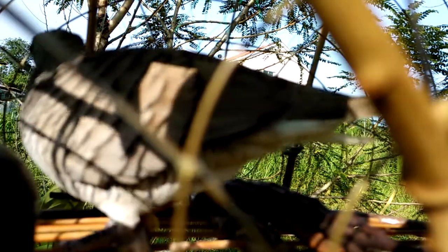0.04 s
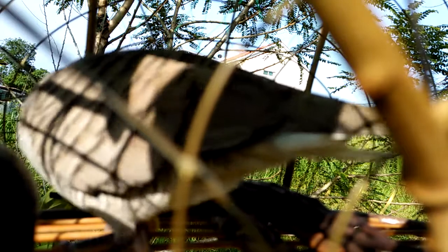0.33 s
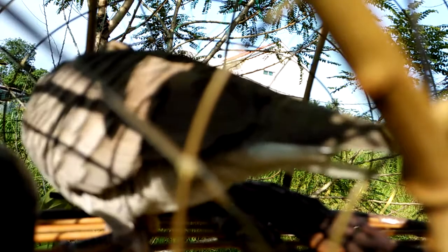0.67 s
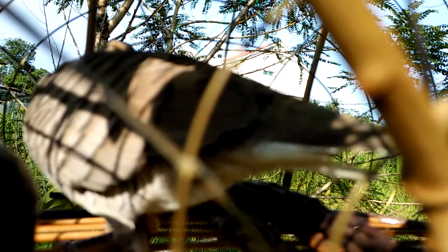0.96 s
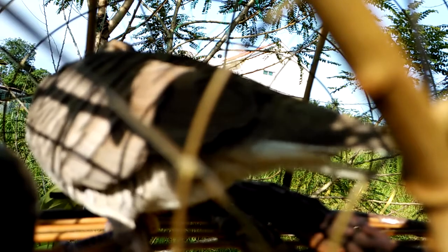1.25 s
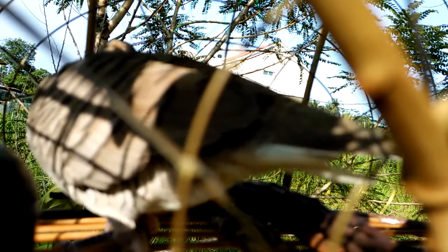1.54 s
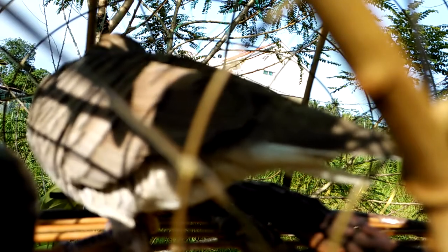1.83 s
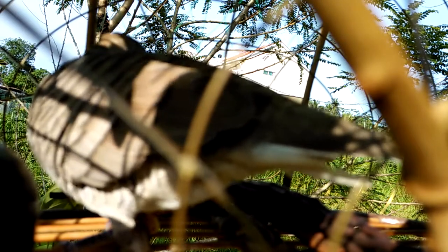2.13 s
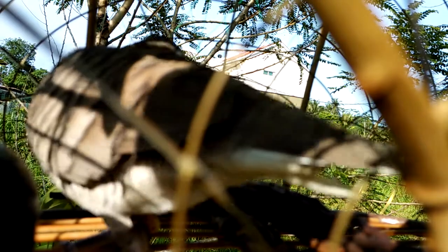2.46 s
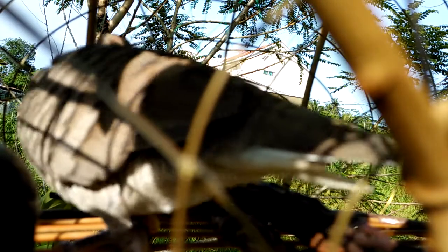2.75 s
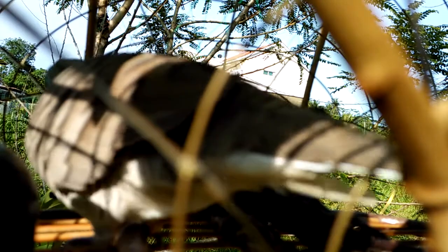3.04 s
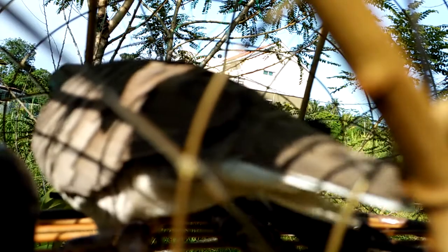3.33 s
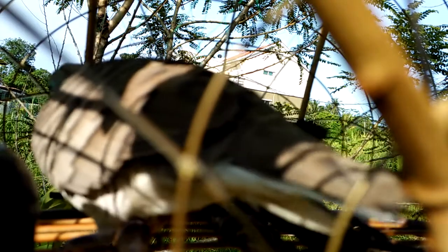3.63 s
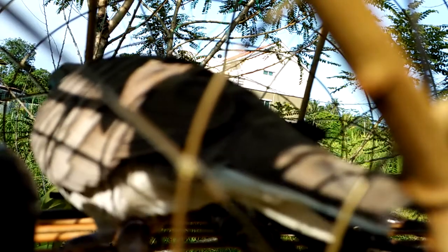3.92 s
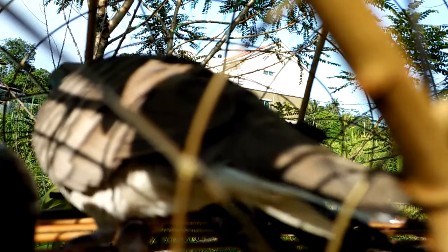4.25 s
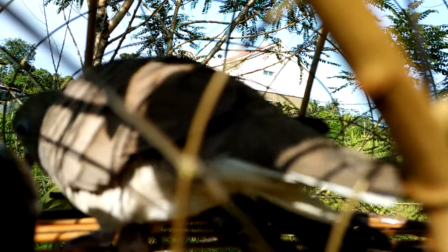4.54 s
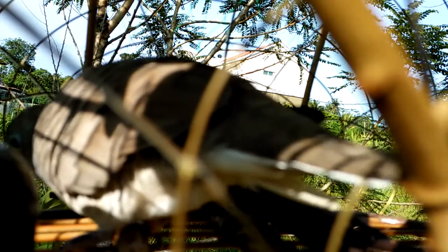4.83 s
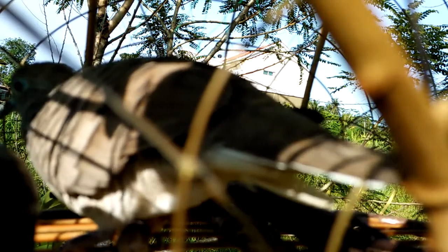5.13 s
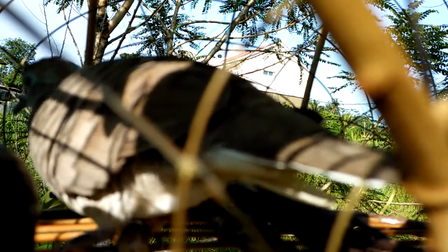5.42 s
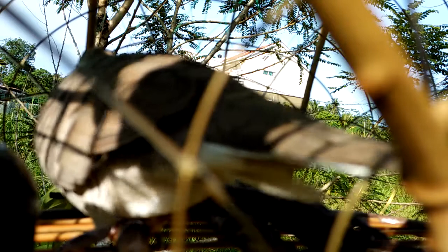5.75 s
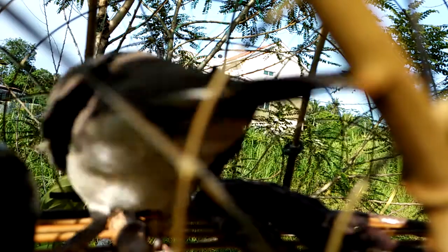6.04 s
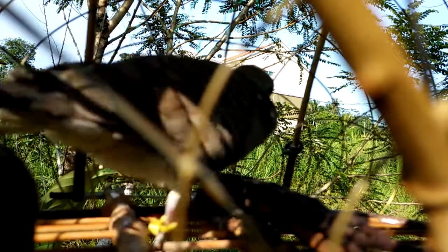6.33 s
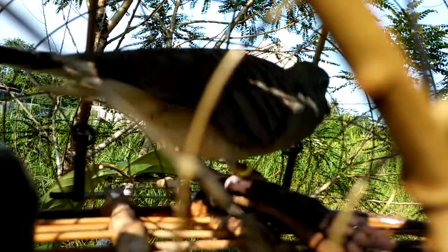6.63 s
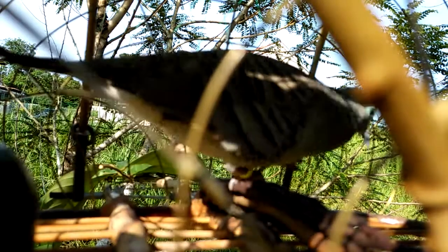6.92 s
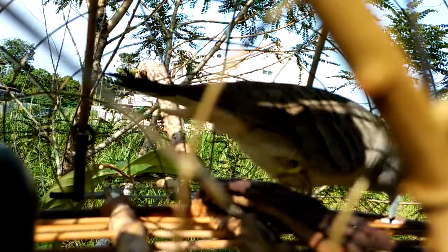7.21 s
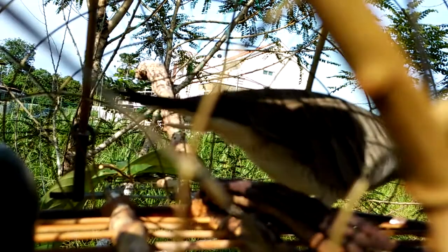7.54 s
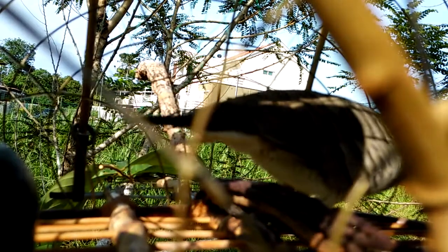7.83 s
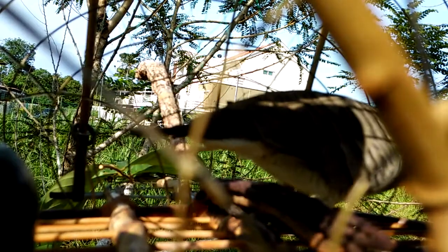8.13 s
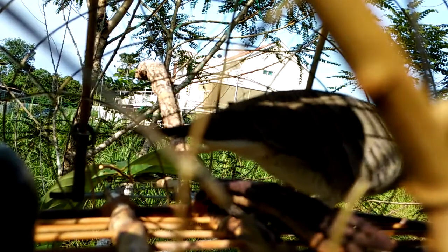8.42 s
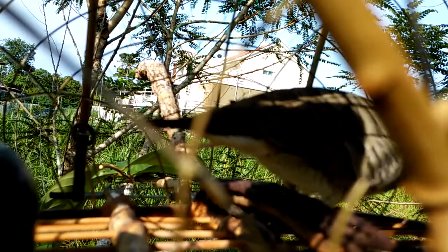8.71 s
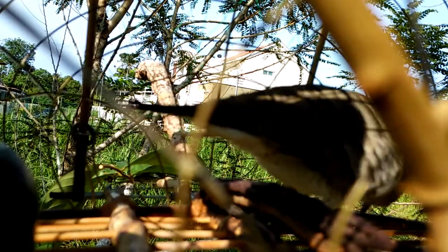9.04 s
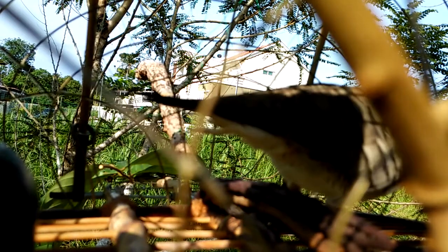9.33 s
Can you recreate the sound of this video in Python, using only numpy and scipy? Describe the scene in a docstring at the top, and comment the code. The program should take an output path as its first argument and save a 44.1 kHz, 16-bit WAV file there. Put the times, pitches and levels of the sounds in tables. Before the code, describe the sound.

A steady, high, gently throbbing insect hiss fills a garden throughout, with small birds chirping and piping in the distance. Beneath lie quiet air, a soft low rumble and a very faint motor rising and falling far away. At about 3 seconds a claw ticks lightly on a perch, and a dove close to the microphone gives a loud, fast, rattling coo that slows and breaks into separate pops, ending near 4.4 seconds. From about 5.4 to 6.6 seconds a second dove answers with the same pattern, softer, farther off and with a little echo. Small dry claw ticks come at around 6.1 and 6.7 seconds. At 7.7 seconds the near dove coos again, its loud trill breaking into fading pops by 8.8 seconds. Insects and faint chirps carry on until the end, at about 9.5 seconds.

```python
"""Zebra doves in a garden

A dove in a cane cage coos twice, close by; a second dove answers softly in between.
Each coo is a rattle of 1 kHz puffs through the syrinx that slows and breaks up into single pops.
Insects hiss in the trees, small birds chirp far off, and claws tick as the dove shifts on its perch.
Underneath lie quiet air, a low rumble and a faint motor revving in the distance."""
import sys
import numpy as np
from scipy import signal
from scipy.fft import rfft, irfft, next_fast_len
from scipy.io import wavfile
from scipy.ndimage import map_coordinates

SR = 44100
rng = np.random.default_rng(int(sys.argv[2]) if len(sys.argv) > 2 else 0)


def transcribe(signal):
    """Save signal, clipped to [-1, 1], as a 16-bit WAV file at the path in sys.argv[1]."""
    frames = np.atleast_2d(signal).T
    limited = np.clip(frames, -1, 1)
    pcm = np.round(limited * 32767).astype(np.int16)
    wavfile.write(sys.argv[1], SR, pcm)


N = 422037

# Levels in all tables are relative: each layer sets its own gain on top.
# the far motor's revs: time_s, firing_hz, level_db
MOTOR_REVS = [(0, 115.1, -95), (1.8, 111.1, -91.5), (2.2, 121.9, -82.5), (2.6, 150.2, -80.5),
              (3.1, 158, -82), (4.0, 135, -80), (4.6, 180.6, -87), (5.5, 135.6, -87.5), (6.2, 104.7, -78.5),
              (7.1, 112.6, -81), (7.9, 186.5, -80), (8.7, 151.9, -86), (9.57, 111.4, -88.5)]


def amp(db):
    """Decibels to gain."""
    return 10 ** (np.asarray(db) / 20)


def unit(x):
    """x at rms 1."""
    return x / np.sqrt(np.mean(x ** 2) + 1e-20)


def ramp(x):
    """x held between 0 and 1."""
    return np.clip(x, 0, 1)


def along(points, hz):
    """(freq_hz, value) points read on a log frequency axis."""
    freqs, values = np.transpose(points)
    return np.interp(np.log(hz + 1), np.log(freqs + 1), values)


def curves(rows):
    """Automation: one value per sample for each column after the time."""
    times, *columns = np.transpose(rows)
    return [np.interp(np.arange(N) / SR, times, column) for column in columns]


def wobble(rate, samples=N):
    """A smooth random curve, rate knots a second."""
    knots = rng.standard_normal(int((samples - 1) / SR * rate) + 4)
    return map_coordinates(knots, [np.arange(samples) * rate / SR])


def add(track, start_s, sound):
    """Mix a sound into a track."""
    start = int(np.clip(round(start_s * SR), 0, N))
    track[start:start + len(sound)] += sound[:N - start]


def filtered(x, response):
    """x through a complex frequency response."""
    size = next_fast_len(N + SR // 2)
    return irfft(rfft(x, size) * response(np.fft.rfftfreq(size, 1 / SR)), size)[..., :N]


def eq(x, colour):
    """x through a curve of (freq_hz, gain_db) points."""
    return filtered(x, lambda hz: amp(along(colour, hz)))


def noise(colour):
    """Coloured noise of rms 1."""
    return unit(eq(rng.standard_normal(N), colour))


def wide_noise(colour):
    """Coloured stereo noise of rms 1, widest near 9.5 kHz."""
    # likeness of left and right: freq_hz, correlation
    likeness = [(4000, 0.92), (6000, 0.98), (8000, 0.86), (9500, 0.44), (11500, 0.78), (14000, 1)]

    def mid_side(hz):
        angle = np.arccos(np.clip(along(likeness, hz), 0, 1)) / 2
        return amp(along(colour, hz)) * [np.cos(angle), np.sin(angle)]

    mid, side = filtered(rng.standard_normal((2, N)), mid_side)
    return unit(np.array([mid + side, mid - side]))


def reflected(x, walls):
    """x with its early reflections: one delayed, weaker copy per wall."""
    return filtered(x, lambda hz: 1 + sum(amp(db) * np.exp(-2j * np.pi * hz * s) for s, db in walls))


def tree_echo(x):
    """The diffuse echo of the garden: a noise tail that dies fastest in the treble."""
    # reverb time among the trees: freq_hz, t60_s
    decay = [(300, .35), (1000, 0.48), (4000, 0.42), (12000, 0.17)]
    hz, t, spectrum = signal.stft(rng.standard_normal(SR // 2), SR, nperseg=256)
    tail = signal.istft(spectrum * amp(-60 * t / along(decay, hz)[:, None]), SR, nperseg=256)[1]
    return signal.fftconvolve(x, tail / np.linalg.norm(tail))[:N]


def low_rumble():
    """Deep noise that swells softly now and then over a low floor."""
    # swells of rumble: middle_s, length_s, level_db
    swells = [(.87, 0.2, -66.5), (1.412, 0.3, -74.5), (2.166, 0.14, -66.5), (2.5, .25, -72.5),
              (3.523, 0.36, -68.5), (4.15, 0.33, -74.5), (5.602, 0.28, -71.5), (6.13, 0.11, -65.5),
              (6.363, 0.11, -65.5), (6.73, .32, -64.5), (7.102, 0.28, -68), (7.879, 0.21, -70.5),
              (8.229, 0.35, -73), (9.354, 0.11, -69)]
    # tone of the rumble: freq_hz, gain_db
    colour = [(15, -35.5), (25, -18), (45, -4), (62, -10.5), (72, -1.5), (78, 3.5), (86, -7), (98, -10),
              (120, -7.5), (160, -18), (240, -26), (400, -50.5)]
    t = np.arange(N) / SR
    floor_power = amp(-81) ** 2
    swell_power = sum(amp(db) ** 2 * np.exp(-(2 * (t - s) / length) ** 2) for s, length, db in swells)
    return np.sqrt(floor_power + swell_power) * amp(-1.5 + 1.2 * wobble(3)) * noise(colour)


def garden_air():
    """A quiet noise bed that sways and follows a share of the motor's swings in level."""
    # tone of the air: freq_hz, gain_db
    colour = [(100, -22.5), (160, -7), (215, -16.5), (290, -4.5), (360, -17.5), (440, -3), (520, -10),
              (800, -0.5), (1100, -8), (1800, -12.5), (2600, -13.5), (3800, -20), (4600, -8.5),
              (5200, -24.5), (8000, -39)]
    motor_db = curves(MOTOR_REVS)[1]
    level_db = -74.5 + 0.3 * (motor_db - motor_db.mean()) + 1.23 * wobble(3.1)
    return amp(level_db) * noise(colour)


def far_motor():
    """A faint drone: three harmonics of the firing rate rise and fall with the revs."""
    # engine harmonics: multiple_of_firing_rate, level_db
    orders = [(1, -3), (2, -18), (3, -11)]
    firing_hz, level_db = curves(MOTOR_REVS)
    firings = np.cumsum(firing_hz * (1 + .012 * wobble(12))) / SR
    drone = sum(amp(db + 2 * wobble(4.7)) * np.sin(2 * np.pi * order * firings) for order, db in orders)
    return amp(level_db - 1.5) * unit(drone)


def insects():
    """A chorus that throbs nine or ten times a second, under a steadier, higher hiss."""
    # strength of the chorus: time_s, level_db
    strength = [(0, -58), (.6, -61), (.92, -61), (1.38, -56), (2.2, -58.5), (3.12, -55.5), (4, -59.5),
                (4.8, -60.5), (5.6, -57.5), (6.25, -54.5), (6.8, -59), (7.7, -55), (8.5, -58.5),
                (9.57, -57)]
    # tone of the chorus: freq_hz, gain_db
    chorus_colour = [(3060, -49.5), (5200, -24), (7360, -0.5), (8120, -3), (9440, -18), (10000, -12.5),
                     (13000, -33), (22000, -120)]
    # tone of the hiss: freq_hz, gain_db
    hiss_colour = [(5290, -29.5), (9000, -8.5), (9570, -12.5), (11700, -0.5), (12400, -8), (13000, -19.5),
                   (14200, -23.5)]
    strength_db, = curves(strength)
    throb_phase = 2 * np.pi * np.cumsum(9.6 + 2 * wobble(6)) / SR
    throb_db = 1.9 * np.sin(throb_phase) * (1 + .45 * wobble(1.5)) + 1.35 * wobble(30)
    chorus = amp(strength_db - 2 + throb_db + .9 * wobble(330)) * wide_noise(chorus_colour)
    gentler_db = strength_db.mean() + .8 * (strength_db - strength_db.mean())
    hiss_db = gentler_db - 7.5 + .3 * throb_db + .7 * wobble(17) + 2 * wobble(700)
    return chorus + amp(hiss_db) * wide_noise(hiss_colour)


def bird_note(length_s, hz, db, glide, rasp, buzz=0):
    """One whistle; glide, random rasp and 780 Hz buzz are shares of its pitch. Rising notes arch."""
    samples = int(length_s * SR)
    t = np.arange(samples) / SR
    progress = t / t[-1]
    bend = glide * (np.sin(np.pi / 2 * progress) if glide > 0 else progress)
    roughness = rasp * (wobble(1100, samples) + .6 * wobble(200, samples))
    pitch_hz = hz * (1 + bend + roughness + buzz * np.sin(2 * np.pi * 780 * t))
    envelope = amp(db + 2.8 * wobble(200, samples)) * 2 * np.sin(np.pi * progress)
    return envelope * np.sin(2 * np.pi * np.cumsum(pitch_hz) / SR)


def small_birds():
    """Chips, buzzes, piping runs, slurs and far calls, smeared by the foliage."""
    # sparrows' falling chips: start_s, pitch_hz, level_db
    chips = [(0.032, 4460, -61.5), (.416, 4290, -65), (0.583, 4430, -62), (1.404, 4900, -62),
             (1.6, 5430, -67), (1.815, 3930, -65.5), (1.885, 4340, -68.5), (1.951, 3550, -67),
             (3.368, 4720, -62), (4.252, 4660, -60.5), (4.35, 4190, -69.5), (4.746, 4830, -61.5),
             (5.505, 4550, -73), (6.076, 4590, -61), (7.374, 4574, -64), (8.424, 4730, -58.5),
             (8.968, 4850, -65)]
    # rising buzzy calls: start_s, pitch_hz, level_db
    buzzes = [(0, 2400, -63), (.084, 3000, -64.5), (1.016, 3600, -70.5), (1.196, 2900, -68.5),
              (1.79, 2900, -64.5), (2.275, 2650, -62), (3.918, 2800, -71), (5.041, 2900, -70.5),
              (6.745, 3200, -69), (7.089, 2600, -72.5), (7.238, 2800, -75.5), (7.743, 2900, -70),
              (7.885, 2900, -67.5), (8.03, 2900, -66.5), (8.168, 2900, -69), (8.364, 2850, -68),
              (8.565, 2850, -67), (8.72, 2900, -72), (8.871, 2900, -70), (9.4, 2920, -75.5)]
    # runs of piping notes, each a little lower: start_s, length_s, first_hz, level_db
    runs = [(1.203, 0.29, 2954, -72.5), (2.443, .23, 2874, -67.5), (3.929, .3, 2720, -74.5),
            (6.312, 0.73, 2990, -81), (7.57, 0.15, 2670, -78)]
    # lower downward slurs: start_s, pitch_hz, level_db
    slurs = [(0.262, 1690, -79), (.611, 1470, -74), (.816, 1920, -72.5), (1.026, 1710, -79),
             (1.28, 1830, -73), (1.36, 1700, -73), (5.55, 2120, -68)]
    # drawn-out calls from very far off: start_s, length_s, start_hz, end_hz, level_db
    far_calls = [(0.917, 0.22, 793, 708, -74.5), (2.62, 0.45, 1244, 1138, -73),
                 (2.649, 0.71, 918, 928, -74.5), (6.906, 0.19, 1002, 950, -72),
                 (8.6, 0.111, 1880, 2080, -75), (8.9, 0.22, 520, 568, -76)]
    pipe_every_s, run_sink_hz_per_s, chatter_count = .085, 400, 45
    chip_s, chip_shape = .058, dict(glide=-.25, rasp=.05)
    out = np.zeros(N)
    for s, hz, db in chips:
        add(out, s, bird_note(chip_s, hz, db, **chip_shape))
    for s, hz, db in buzzes:
        add(out, s, bird_note(.054, hz, db, glide=.35, rasp=.045, buzz=.17))
    for s, length_s, hz, db in runs:
        for age in np.arange(0, length_s, pipe_every_s):
            add(out, s + age, bird_note(.072, hz - run_sink_hz_per_s * age, db, glide=-.055, rasp=.04))
    for s, hz, db in slurs:
        add(out, s, bird_note(.0637, hz, db, glide=-.216, rasp=.023))
    for s, length_s, start_hz, end_hz, db in far_calls:
        add(out, s, bird_note(length_s, start_hz, db, glide=end_hz / start_hz - 1, rasp=.032))
    # faint chatter: more chips at random times and pitches
    chatter_s = rng.uniform(0, N / SR, chatter_count)
    for s, (detune, size) in zip(chatter_s, rng.standard_normal((chatter_count, 2))):
        add(out, s, bird_note(chip_s, 3080 * np.exp(.35 * detune), -82 + 2 * size, **chip_shape))
    return amp(-2.5) * out + amp(-8.5) * tree_echo(out)


def claws():
    """Dry little ticks of noise as the dove shifts its feet."""
    # claws on the perch: start_s, level_db
    ticks = [(3.0762, -49), (6.1431, -43), (6.7039, -50.5)]
    # tone of a tick: freq_hz, gain_db
    colour = [(300, -16.5), (1800, -2), (3000, -8), (5000, -3), (10000, 9.5), (14000, -2)]
    t60_s = .11
    out, t = np.zeros(N), np.arange(SR // 10) / SR
    for s, db in ticks:
        add(out, s, amp(db - 10 - 60 * t / t60_s) * rng.standard_normal(len(t)))
    return eq(out, colour)


def add_puff(track, peak_s, db, hz, rise_s, phase, fall_s, sag_hz):
    """One puff through the syrinx: a few cycles that swell, sag in pitch and ring out."""
    t = np.arange(-SR // 50, SR // 50) / SR
    lead_in = amp(-23)  # a faint tone fades in just before each puff
    swell = (1 - lead_in) * np.exp(-(t / (.64 * rise_s)) ** 2) + lead_in * np.exp(-(t / .008) ** 2)
    envelope = np.where(t < 0, swell, 1 / np.cosh(t / fall_s))
    cycles = np.cumsum(hz - sag_hz * np.tanh(t / .0052)) / SR
    tone = np.cos(phase + 2 * np.pi * (cycles - cycles[t >= 0][0]))
    add(track, peak_s + t[0], amp(db) * envelope * tone)


def trill(rows, fall_s, sag_hz):
    """Fast puffs take their phase from one running throat tone and fuse; they stumble at first."""
    stumble_s, scatter_db, slip_rad = .0003, 2.4, .7
    s, rate, throat_hz, puff_hz, level_db, rises = np.transpose(rows)
    t = np.arange(s[0], s[-1], 1 / SR)
    beats = np.cumsum(np.interp(t, s, rate)) / SR
    puff_times = np.interp(np.arange(beats[-1] % 1, beats[-1] + 1 / 2), beats, t)
    unsteadiness = .08 + np.exp(-((puff_times - s[0]) / .11) ** 2)
    jitter = rng.standard_normal((len(puff_times), 3)) * unsteadiness[:, None]
    throat_phase = 2 * np.pi * np.cumsum(np.interp(t, s, throat_hz)) / SR
    out = np.zeros(N)
    for due_s, (late, size, slip) in zip(puff_times, jitter):
        at = due_s + stumble_s * late
        phase = np.interp(at, t, throat_phase) + slip_rad * slip
        db, hz, rise_s = (np.interp(at, s, column) for column in (level_db, puff_hz, rises))
        add_puff(out, at, db + scatter_db * size, hz, rise_s, phase, fall_s, sag_hz)
    return out


def pops(peak_s, level_db, pitch_hz, rise_s, fall_s, sag_hz):
    """Separate puffs, each with its own random phase."""
    out = np.zeros(N)
    for s, db, hz, rise in np.broadcast(peak_s, level_db, pitch_hz, rise_s):
        add_puff(out, s, db, hz, rise, rng.uniform(0, 2 * np.pi), fall_s, sag_hz)
    return out


def answering_dove():
    """The same song from farther off, with more echo; its closing pops sink and sharpen."""
    # the slowing rattle: time_s, puffs_per_s, throat_hz, puff_hz, level_db, rise_s
    rattle = [(5.425, 134.7, 987, 1060, -57.5, 0.0011), (5.49, 123.4, 1057, 990, -41, 0.0018),
              (5.55, 114.8, 1022, 1056, -32, 0.0079), (5.62, 107.5, 1076, 1070, -33.5, 0.0038),
              (5.69, 98.9, 1024, 1074, -31, 0.0061), (5.75, 73.3, 1072, 1060, -31, 0.0059),
              (5.8184, 62.8, 1020, 1037, -32, 0.0033)]
    # the pops after it: peak_s, level_db
    closing_pops = [(5.8849, -32.5), (5.9821, -34.5), (6.0758, -35), (6.1717, -37.5), (6.2447, -37),
                    (6.3213, -40.5), (6.3991, -45), (6.452, -52), (6.5213, -49), (6.619, -53.5)]
    # tone of the far voice: freq_hz, gain_db
    colour = [(300, -25.5), (600, 0), (800, 1), (1100, -6.5), (1350, 13.5), (1700, 11), (2300, -16)]
    # early reflections: delay_s, gain_db
    walls = [(.0048, -22.5), (0.0113, -9.5), (0.0236, -41)]
    s, db = np.transpose(closing_pops)
    age = s - s[0]
    pitch_hz = 1037 - 114 * age
    rise_s = .006 * np.exp(-age / .5)
    voice = trill(rattle, fall_s=.0016, sag_hz=7.8)
    voice += amp(.9) * pops(s, db, pitch_hz, rise_s, fall_s=.0016, sag_hz=25.8)
    voice = reflected(eq(voice, colour), walls)
    return amp(1.8) * voice + amp(-13) * tree_echo(voice)


def nearest_coo(s):
    """Time since the start of the nearest coo, with its hum and octave levels."""
    # the near dove's coos: start_s, hum_db, octave_db
    coos = [(3.155, -28.5, -27.5), (7.663, -25, -39)]
    start_s, hum_db, octave_db = np.transpose(coos)
    which = np.argmin(np.abs(np.subtract.outer(s, start_s + 1 / 2)), axis=-1)
    return s - start_s[which], hum_db[which], octave_db[which]


def throat_fullness(age):
    """The throat swells, stays full and empties over a coo: 0 to 1."""
    swell_start_s, swell_s, empty_start_s, empty_s = .094, .055, .78, .26
    return ramp((age - swell_start_s) / swell_s) * ramp(1 - (age - empty_start_s) / empty_s)


def throat_hum(age, level_db):
    """A narrow band of noise hums while the throat is full, fades as the trill breaks up, and stops."""
    hold_s, fade_db_per_s, end_s, release_s = .43, 43, .715, .018
    hum = noise([(600, -64), (880, -9.5), (935, 9.5), (1000, -11), (1200, -11), (1320, -15.5),
                 (1450, -35), (2200, -60)])
    gate = throat_fullness(age) ** 2 * ramp((end_s - age) / release_s)
    return gate * amp(level_db - fade_db_per_s * np.maximum(age - hold_s, 0)) * hum


def near_pops():
    """Pops sink as the air runs out; a full throat rounds them and softens their opening snap."""
    # single puffs before and after the trills: peak_s, level_db
    puffs = [(3.1549, -31.5), (3.192, -31), (3.2041, -34), (3.2211, -24.5), (3.226, -23.5), (3.2393, -21.5),
             (3.247, -24), (3.6271, -17.5), (3.6427, -9.5), (3.732, -10), (3.777, -15), (3.7991, -12),
             (3.8543, -11.5), (3.96, -13), (4.0437, -16), (4.0881, -17), (4.1728, -21.5), (4.2227, -43.5),
             (4.2615, -45), (4.2807, -27), (4.3495, -25.5), (7.667, -29), (7.7062, -38), (7.72, -26),
             (7.7327, -19.5), (7.7438, -18.5), (7.7516, -19.5), (8.2182, -9.5), (8.2356, -10.5),
             (8.284, -15), (8.302, -11.5), (8.3414, -13), (8.3636, -20), (8.4107, -29), (8.4458, -13),
             (8.489, -16), (8.535, -16), (8.583, -17.5), (8.6415, -20), (8.6851, -22.5), (8.7332, -20),
             (8.8227, -23)]
    fresh_hz, spent_hz, spend_s = 1075, 916, .64
    sharp_rise_s, round_rise_s = .00105, .0041
    s, db = np.transpose(puffs)
    age = nearest_coo(s)[0]
    fullness = throat_fullness(age)
    pitch_hz = spent_hz + (fresh_hz - spent_hz) * np.exp(-(age / spend_s) ** 2)
    rise_s = sharp_rise_s + (round_rise_s - sharp_rise_s) * fullness
    bodies = pops(s, db - .42, pitch_hz, rise_s, fall_s=.0015, sag_hz=60.2)
    snap_db = db - 26 - 8 * fullness
    snaps = pops(s - .9 * rise_s, snap_db, pitch_hz=1620, rise_s=.0012, fall_s=.00092, sag_hz=39.8)
    return bodies + snaps


def near_dove():
    """Two coos with a soft hum, a faint octave and a trace of rasp, coloured by throat and cage."""
    # the two slowing rattles: time_s, puffs_per_s, throat_hz, puff_hz, level_db, rise_s
    first_rattle = [(3.256, 135, 1197, 980, -16, .0022), (3.31, 140, 1209, 1006, -11.5, 0.0035),
                    (3.40, 114, 1238, 1048, -9.5, 0.0028), (3.45, 109, 1185, 1097, -10, 0.0035),
                    (3.51, 100, 1163, 1105, -13, 0.0064), (3.55, 80, 1171, 1122, -11.5, 0.0043),
                    (3.6064, 70, 1171, 1040, -9.5, 0.0032)]
    last_rattle = [(7.762, 130.8, 1130, 965, -18, 0.00072), (7.815, 136, 1115, 999, -15, 0.0027),
                   (7.838, 120.5, 1108, 1022, -9, 0.0032), (7.925, 115.1, 1100, 1035, -6.5, .0036),
                   (7.969, 103.6, 1168, 1094, -7, 0.0029), (8.05, 96.5, 1150, 1090, -10, 0.0066),
                   (8.092, 67.64, 1160, 1064, -6, 0.0028), (8.1634, 62, 1080, 978.5, -8, 0.0064)]
    # resonance of the throat: freq_hz, gain_db
    throat = [(200, -27), (450, -10.5), (700, -3), (1000, 0), (1400, 9), (1750, 1), (2100, -13),
              (2600, -7.5), (4000, -16)]
    # reflections in the cane cage: delay_s, gain_db
    cage = [(.00513, -11.5), (0.0098, -22), (0.0188, -30.5)]
    age, hum_db, octave_db = nearest_coo(np.arange(N) / SR)
    trills = sum(trill(rows, fall_s=.0017, sag_hz=30) for rows in (first_rattle, last_rattle))
    source = amp(-2.5) * trills + throat_hum(age, hum_db) + near_pops()
    swing = signal.hilbert(source, next_fast_len(N))[:N]
    # the octave grows with the square of the swing and rings near 2.3 kHz
    octave = amp(octave_db) * np.real(swing ** 2)
    octave = eq(octave, [(1800, -4.5), (2100, -3.5), (2350, 5.5), (2700, -4)])
    # each puff also carries some turbulence
    turbulence = noise([(100, -24), (200, -14), (350, -13.5), (700, 1.5), (1600, -4.5), (2500, -13.5),
                        (4000, -29.5), (8000, -59.5)])
    rasp = amp(-45) * np.abs(swing) * turbulence
    voice = reflected(eq(source, throat) + octave, cage) + rasp
    return voice + amp(-35.5) * tree_echo(voice)


def scene():
    """Birds and background sit in the middle; only the insects spread out."""
    birds = near_dove() + answering_dove() + small_birds() + claws()
    return birds + far_motor() + low_rumble() + garden_air() + insects()


def record(dry):
    """A brick-wall cut takes off the top of the treble."""
    top_hz = 14300
    return filtered(dry, lambda hz: hz < top_hz)


dry = scene()
out = record(dry)
transcribe(out)
```